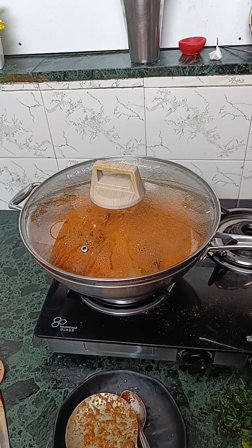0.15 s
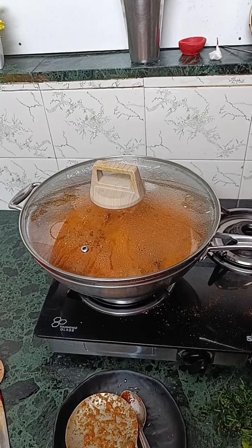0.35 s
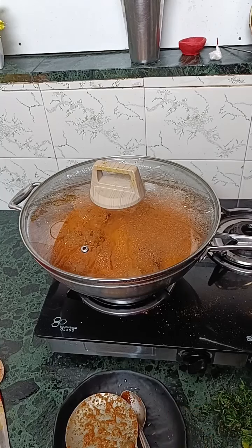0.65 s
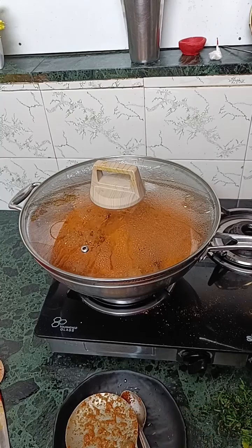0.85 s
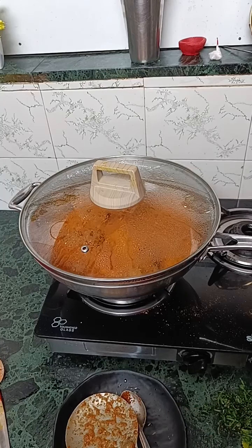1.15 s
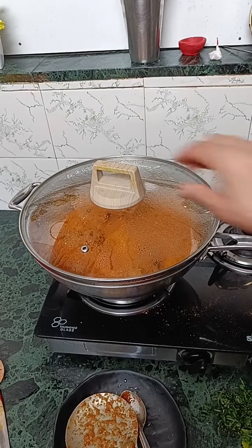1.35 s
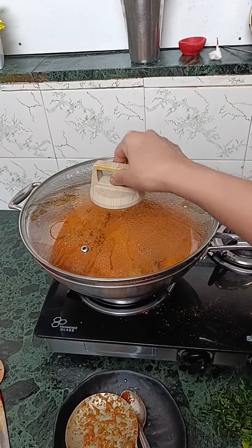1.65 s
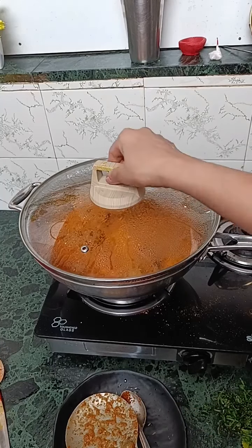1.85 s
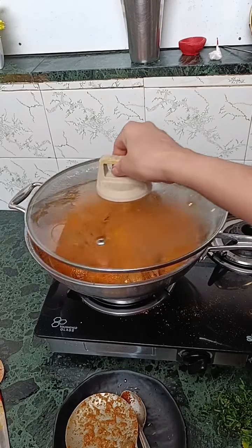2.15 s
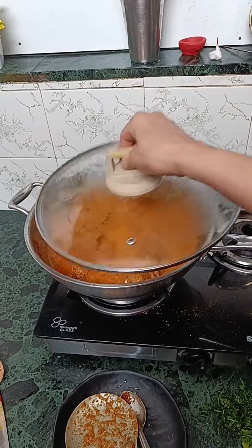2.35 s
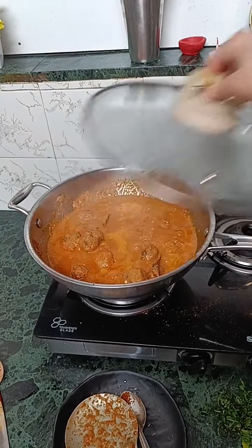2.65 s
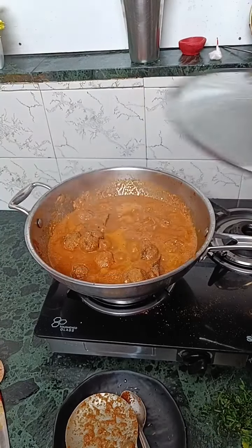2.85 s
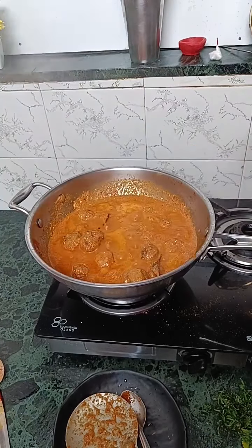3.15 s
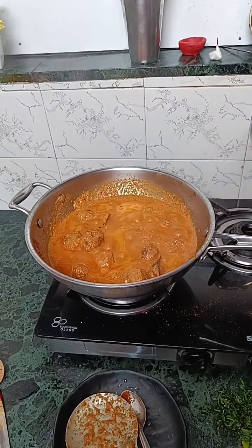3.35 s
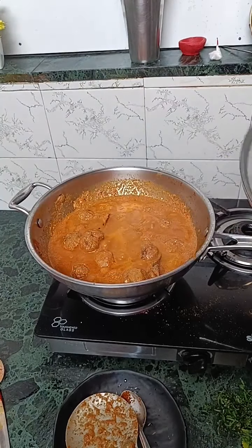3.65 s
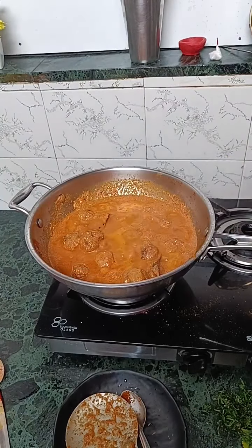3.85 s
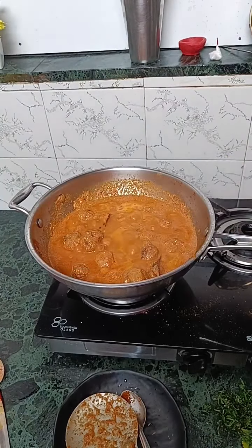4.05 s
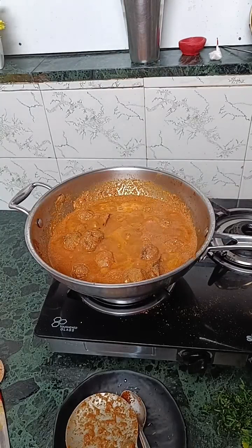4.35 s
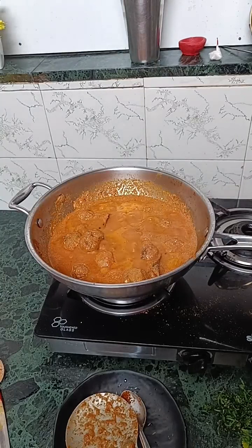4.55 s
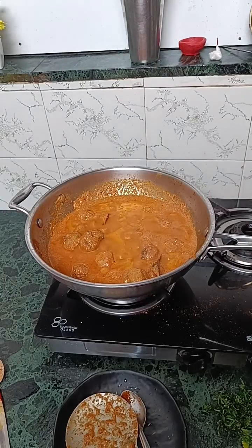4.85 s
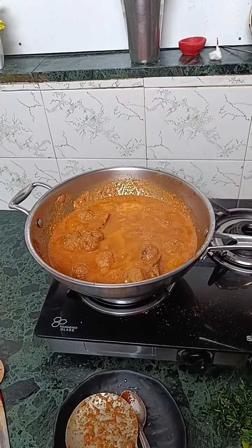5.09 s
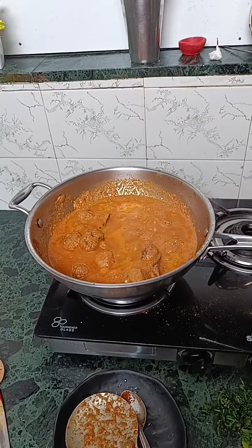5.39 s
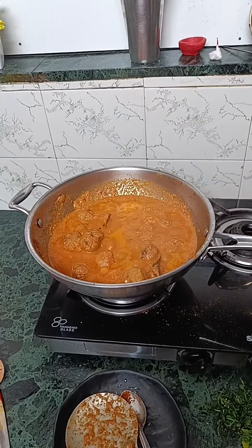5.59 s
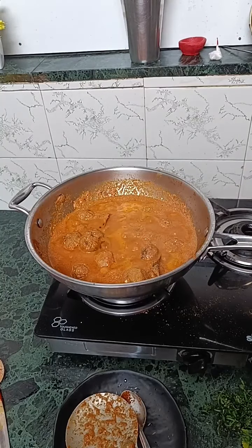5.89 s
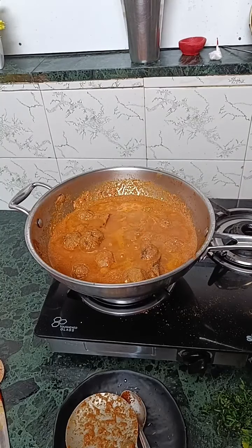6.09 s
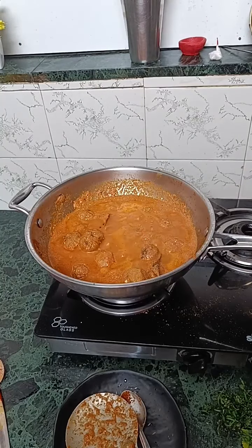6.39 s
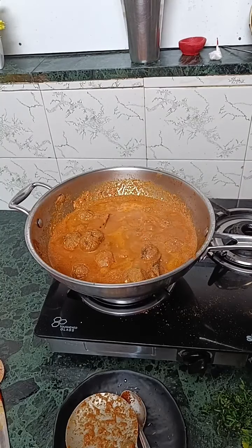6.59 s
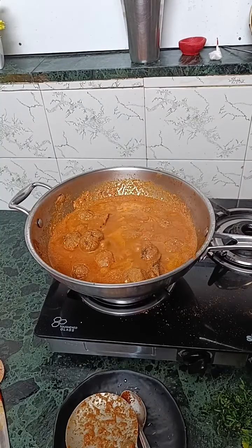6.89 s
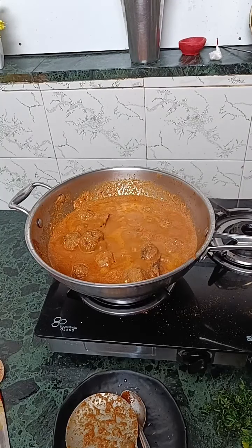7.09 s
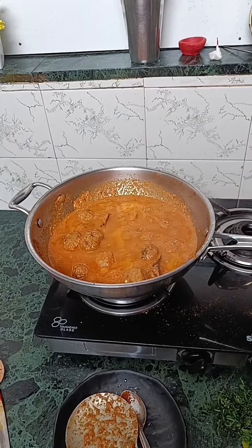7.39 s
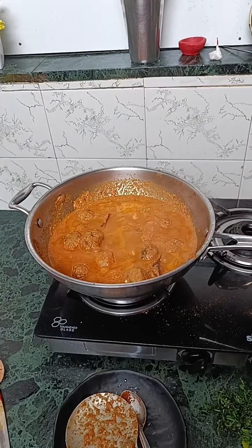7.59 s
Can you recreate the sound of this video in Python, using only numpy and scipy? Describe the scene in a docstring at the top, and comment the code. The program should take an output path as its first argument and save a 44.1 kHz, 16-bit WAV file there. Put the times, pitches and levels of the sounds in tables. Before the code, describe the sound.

In a small tiled kitchen, a gas flame hisses steadily under a simmering curry. A wooden knock on the stone worktop comes first. The muffled bubbling opens up as the glass lid is lifted, its hollow ringing gliding upward. Plops continue, then the lid's rim rattles and scrapes on steel and stone. A loud cluster of wooden thumps on the worktop ends it. Close stereo microphone.

```python
"""A curry simmers in a steel pan: small bubbles ring at random and bigger ones burst with a short tone and a splash.
A glass lid muffles the small ones at first; as it is lifted, two ringing notes of the air under it climb, then fade.
Later the lid rattles on its rim against steel and stone: uneven contacts ring its higher modes and grind.
Something wooden is put down on the worktop at the start and at the end, making the worktop ring; small ticks sound too.
Shaped noise makes the gas flame's hiss and the room tone throughout; a small tiled kitchen adds echoes."""
import sys
import numpy as np
from scipy import signal
from scipy.fft import rfft, irfft
from scipy.io import wavfile

SR = 44100
rng = np.random.default_rng(int(sys.argv[2]) if len(sys.argv) > 2 else 0)


def store_wav(level_fs):
    """Save 16-bit WAV to argv[1]."""
    pcm = np.round(np.clip(np.atleast_2d(level_fs), -1, 1) * 32767)
    wavfile.write(sys.argv[1], SR, pcm.T.astype(np.int16))


N = 340893
TIME = np.arange(N) / SR   # s

# Room tone, tilt of its noise: [f/Hz, relative level/dB]
ROOM_TONE_COLOUR = [(22, -22), (69, 14), (115, 1.5), (231, 11), (324, 4.5), (586, 5.5), (824, -17),
                    (1600, -30), (3000, -44)]
# Steady sounds, how alike left and right are: [f/Hz, likeness from 0 to 1]
STEREO_LIKENESS = [(60, 0.71), (240, 1), (950, 0.022), (15000, 0.037)]
# Gas flame over time: [t/s, hiss level/dB, fizz level/dB]
FLAME_LEVELS = [(0, -56.5, -60.5), (.9, -58, -63), (1.9, -59.5, -67), (3, -57, -64), (4.7, -56, -62),
                (7.73, -55, -63)]
# Hiss of the flame: [f/Hz, relative level/dB]
HISS_COLOUR = [(820, -1.5), (1400, -1), (2390, -2.5), (3970, 0.5), (4860, -4), (7050, -1), (8300, -11),
               (10800, -81)]
# Finer, higher fizz of the flame: [f/Hz, relative level/dB]
FIZZ_COLOUR = [(4410, -43), (7500, -12.5), (9800, -13), (14200, -12.5), (15500, -6), (15900, -66)]
# Echoes of the tiled kitchen: [f/Hz, time to die by 60 dB t/s]
ECHO_TIMES = [(150, 0.23), (500, 0.32), (2000, 0.23), (6000, 0.16), (14000, 0.053)]
# Spatters and small ticks of steel: [t/s, relative level/dB, pitch f/Hz, snap against the swell level/dB]
TICKS_AND_SPATTERS = [(0.243, -46.5, 6060, 12.5), (0.304, -48.5, 5530, -2), (2.387, -52.5, 3060, -3),
                      (2.671, -49.5, 1410, -11), (3.203, -47.5, 3530, 12.5), (3.468, -49, 2350, -7),
                      (3.484, -53.5, 7040, 9), (4.064, -51, 2100, 8), (4.076, -51.5, 5770, 8),
                      (4.384, -43.5, 4100, -31), (4.406, -51, 2010, 2), (4.471, -45.5, 2690, -21),
                      (4.799, -37.5, 1860, -21), (4.829, -47, 4030, -21), (5.156, -43, 2040, -9),
                      (5.8174, -51.5, 4030, 11), (5.928, -47, 2870, 19), (6.7018, -47, 1570, 7),
                      (6.79, -44, 2280, 10), (6.976, -60, 2110, 12), (7.0162, -43, 3930, 0),
                      (7.598, -37.5, 1310, -20)]
# Things put down on the worktop: [t/s, level/dB, extra on the low modes level/dB,
# tilt of the top modes in dB per octave, crack against the body level/dB]
LANDINGS = [(0.2423, -8, 5.5, -13, -34), (0.268, -44, 7, -6, -40), (0.3075, -17.5, 12.5, -13, -35),
            (0.351, -26.5, 4, -10, -48), (0.445, -19, 1.5, 0.5, -11), (1.911, -34, -10.5, -11, -11.5),
            (7.289, -13, -18, 2, -38), (7.296, -8, -31, -1.5, -49), (7.321, -24, 12, 1, -31),
            (7.352, 1, 8.5, -12, -17), (7.361, -16, -3, 7, -0.5), (7.374, -8.5, -11, -2, -12),
            (7.39, -14, 6, 14, -9.5), (7.409, -12.5, -1, -4, -12.5), (7.429, -6.5, -26, 0, -23),
            (7.438, -10, -6, 3, -23), (7.478, -13, 11, 5.5, -15), (7.53, -23, 11.5, 0, -23)]
# Modes of the worktop: [f/Hz, relative level/dB, time to die by 60 dB, if not damped sooner t/s]
WORKTOP_MODES = [(140, -10, 0.09), (311, 1.5, 0.05), (350, 0, 0.054), (426, 4, 0.12), (502, -5.5, 0.13),
                 (527, 13, 0.019), (700, 9, 0.03), (870, 0, 0.042), (980, 10, 0.036), (1125, 1, 0.025),
                 (1560, -1, 0.033), (2010, 10.5, 0.096), (2320, 0, 0.14), (2900, -0.5, 0.065),
                 (3540, 0.5, 0.033), (4330, -12, 0.13)]
# Crack of a hard contact: [f/Hz, relative level/dB]
CRACK_COLOUR = [(710, -1), (1200, -3.5), (2320, -3), (2910, -9), (4200, -6.5), (7190, -17), (14200, -31),
                (15800, -34)]
# Lid rattling on its rim, two bouts: [t/s, relative contact level/dB, low-mid share against it level/dB]
RIM_CONTACT = [(5.185, -25, -10), (5.191, -13, -12.5), (5.206, -26, 0), (5.24, -21.5, -9),
               (5.263, -27.5, -7), (5.294, -20, -1), (5.38, -23, 0), (5.49, -29.5, 2), (5.547, -44, 7),
               (5.551, -23, -6.5), (5.58, -23.5, -6.5), (5.609, -22.5, -8), (5.66, -31, -7.5),
               (5.72, -48, -1.5), (5.799, -61, 1)]
# Firm blows of the rim: [t/s, relative level/dB]
RIM_BLOWS = [(5.19, -15.5), (5.29, -14), (5.552, -18.5)]
# Higher modes of the lid: [f/Hz, width before narrowing f/Hz, relative level/dB,
# one or more moments when the touching point drives it best t/s]
LID_MODES = [(550, 40, -3, 5.3), (1100, 23, -11, (5.36, 5.46)), (1280, 36, -11, (5.3, 5.45, 5.61)),
             (1550, 30, -5, (5.22, 5.36)), (1720, 60, -5, 5.31), (1900, 30, -3, 5.69), (2120, 26, -2, 5.36),
             (2290, 60, -3, (5.3, 5.42, 5.56)), (2480, 23, -4, 5.43), (3110, 30, -8, (5.19, 5.72)),
             (3460, 60, -6, 5.552), (4250, 44, 0, (5.2, 5.24)), (4480, 23, -7, 5.4), (5020, 59, -6, 5.38),
             (5270, 40, -7, 5.2), (5590, 18, -5, (5.63, 5.7)), (6060, 50, -1, 5.595), (6270, 46, -6, 5.2),
             (6590, 70, -6, 5.3), (6850, 40, -4, (5.4, 5.46, 5.635)), (8340, 60, -12, 5.34)]
# Left against right for the lid modes: [f/Hz, level/dB]
LID_BALANCE = [(60, 0.5), (240, -12), (950, 7.5), (3770, 6), (15000, 17)]
# Grinding of the rim on steel: [f/Hz, relative level/dB]
GRIND_COLOUR = [(290, -36), (500, -15), (707, -15), (841, 1), (958, -7), (2710, 2.5), (6830, 1.5),
                (10000, -8), (14500, -8)]
# Lowest lid modes singing: [peak t/s, lower mode level/dB, upper mode against it level/dB,
# rise from -20 dB t/s, fall to -20 dB t/s]
LID_SINGS = [(5.32, -42, 8, .08, .035), (5.435, -28.5, -3, .08, .09), (5.6, -44, 8, .04, .05),
             (5.68, -37.5, -14, .07, .105)]
# Worktop rumbling around each bout: [peak t/s, level/dB, rise from -20 dB t/s, fall to -20 dB t/s]
WORKTOP_RUMBLES = [(5.3, -44, .13, .16), (5.61, -42, .075, .075)]
# Air under the lid: [shut f/Hz, open f/Hz, width f/Hz, level before the fade level/dB,
# bubbles per second, spread of their sizes level/dB]
LID_AIR = [(409, 600, 40, -60, 200., 3.2), (1105, 1195, 35, -70, 45., 3)]
# Bubbles that burst clearly: [t/s, relative level/dB, starting pitch f/Hz]
BURSTING_BUBBLES = [(0.79, -33, 1070), (1.403, -27, 1108), (1.829, -35.5, 390), (1.932, -26, 399),
                    (2.138, -36.5, 446), (2.238, -31, 1170), (2.314, -37, 560), (2.421, -32.5, 578),
                    (2.929, -31, 870), (2.969, -32, 940), (3.193, -26, 850), (3.749, -28.5, 924),
                    (3.907, -32.5, 965), (4.031, -35.5, 683), (4.256, -26, 840), (4.462, -30, 688),
                    (4.598, -29.5, 910), (4.813, -32.5, 1230), (4.88, -31.5, 927), (4.98, -34.5, 808),
                    (6.467, -19.5, 928), (6.517, -35, 1030), (6.635, -37, 960), (6.646, -23.5, 870),
                    (6.689, -28, 1240), (6.791, -36, 582)]

LIFT_S, OPEN_S, CLEAR_S = 1.97, 2.35, 2.47   # the lid starts to tilt, the gap is wide, the lid leaves the pan
UNMUFFLED_S = 2.92   # the muffling, easing since the first tilt, has gone
SIMMER_DB, MUFFLED_DB = -60.5, -42   # small bubbles in the open pan, and their change under the shut lid
LID_AIR_FADE_DB_PER_S = 43   # once the lid is clear
LOWEST_LID_MODES_HZ = (456, 851)
RUMBLE_MODES_HZ = (160, 285)
WEAK_MODES, WEAK_T60_S = 190, .3   # number of weak lid modes, and their time to die by 60 dB
LANDING_RISE_S = 0.00385   # time for a landing to reach half strength
LOW_MODES_HZ, TOP_MODES_HZ = 450, 800   # low worktop modes end, top modes begin
FIRM_DB, FIRM_CYCLES = 27, .25   # firm contact against the scuffing, and its length in cycles of each mode
LONGEST_RING_S = .045   # the hand and the weight of the thing damp every mode
ROCK_DB, ROCK_PER_S, ROCK_T60_S = -9, 250., .16   # the thing rocks and chatters as it settles
THUD_LAG_S = .0002   # the landings reach the right port first
TICK_RISE_S, TICK_T60_S, SNAP_T60_S = 0.0013, 0.2, 0.032   # swell and tail of a tick, and its first snap
ROOM_TONE_DB, CUTOFF_HZ = -60, 15800


def from_db(db):
    """Turns a level in dB into a gain."""
    return 10 ** (np.asarray(db) / 20)


def rms_one(x):
    """Scales a sound to an rms (a kind of average strength) of 1."""
    return x / np.sqrt(np.mean(x ** 2) + 1e-30)


def in_time(rows):
    """Joins the rows of a table by straight lines and reads them at every sample."""
    s, *columns = np.transpose(rows)
    return [np.interp(TIME, s, column) for column in columns]


def at_hz(points, hz):
    """Reads a frequency table on an axis where octaves are equally wide."""
    table_hz, values = np.array(points).T
    return np.interp(np.log(hz + 1), np.log(table_hz), values)


def ramp(start, end):
    """Climbs evenly from 0 at start to 1 at end."""
    return np.clip((TIME - start) / (end - start), 0, 1)


def swells(rows):
    """Adds gains that rise to a flat top and fall away ever faster."""
    total = 0
    for s, db, rise, fall in rows:
        distance = np.clip(np.maximum((s - TIME) / rise, (TIME - s) / fall), 0, 9)
        total = total + from_db(db - 20 * distance ** 3)
    return total


def highpass(x, hz, order):
    """Takes away what lies below hz."""
    return signal.sosfilt(signal.butter(order, hz, "high", fs=SR, output="sos"), x)


def bandpass(x, low, high, order):
    """Keeps what lies between two frequencies."""
    return signal.sosfilt(signal.butter(order, [low, high], "band", fs=SR, output="sos"), x)


def colour(x, spectrum):
    """Filters by a frequency table, with minimum phase so that nothing sounds early."""
    size = 4096
    cepstrum = irfft(np.log(from_db(at_hz(spectrum, np.fft.rfftfreq(size, 1 / SR)))))
    cepstrum[1:size // 2] *= 2
    cepstrum[size // 2 + 1:] = 0
    kernel = irfft(np.exp(rfft(cepstrum)))
    kernel = kernel / np.sqrt(np.sum(kernel ** 2))
    return signal.oaconvolve(np.atleast_2d(x), kernel[None], axes=1)[:, :N]


def drift(rate):
    """Wanders slowly by chance: noise through two one-pole low-passes at rate Hz, with spread 1."""
    step, settle = 40, 2000   # samples per slow point, and slow points thrown away
    r = np.exp(-2 * np.pi * step * rate / SR)
    slow = signal.lfilter([1], [1, -2 * r, r * r], rng.standard_normal(N // step + settle + 2))[settle:]
    return np.interp(np.arange(N) / step, np.arange(len(slow)), rms_one(slow))


def ring(clicks, hz, t60):
    """Lets each unit click start a sine of about height 1 that dies by 60 dB in t60 seconds."""
    r, w = from_db(-60 / (t60 * SR)), 2 * np.pi * hz / SR
    return signal.lfilter([0, np.sin(w)], [1, -2 * r * np.cos(w), r * r], clicks + 1e-18)


def grains(per_s, spread_db):
    """Scatters random clicks of uneven size, with rms 1."""
    sizes = from_db(spread_db * np.minimum(rng.exponential(1, N), 4)) * rng.choice([-1, 1], N)
    return rms_one(sizes * (rng.random(N) < per_s / SR))


def panned(x, db):
    """Makes two channels, the left louder by db."""
    return x * from_db([[db / 2], [-db / 2]])


def steady(spectrum, flicker_db):
    """Builds stereo noise from half-octave bands, each with its own flicker and likeness; rms 1."""
    out, edges = 0, 20 * 2 ** np.arange(0, 10.1, .5)
    edges = edges[(edges > spectrum[0][0] / 1.5) & (edges < spectrum[-1][0] * 1.5)]
    white = rng.standard_normal((2, 2, N))
    for k, (low, high) in enumerate(zip(edges, edges[1:])):
        mid, side = bandpass(white[k % 2], low, high, 2)
        alike = at_hz(STEREO_LIKENESS, np.sqrt(low * high))
        band = np.sqrt(1 + alike) * mid + np.sqrt(1 - alike) * side * [[1], [-1]]
        out = out + from_db(flicker_db * drift(2.0)) * band
    return rms_one(colour(out, spectrum))


def room_tone():
    """The quiet air of the room: low noise whose bands come and go."""
    return from_db(ROOM_TONE_DB) * steady(ROOM_TONE_COLOUR, flicker_db=3)


def gas_flame():
    """Rushing gas: an even hiss and a slightly flickering fizz, each following its own level."""
    hiss_db, fizz_db = in_time(FLAME_LEVELS)
    hiss = from_db(hiss_db) * steady(HISS_COLOUR, flicker_db=0)
    return hiss + from_db(fizz_db) * steady(FIZZ_COLOUR, flicker_db=1.0)


def kitchen(x):
    """Tiled walls: a dense tail of echoes, partly different in each channel, dying soonest in the top treble."""
    t, tail, edges = np.arange(int(.7 * SR)) / SR, 0, 60 * 2. ** np.arange(9)
    white = rng.standard_normal((2, len(t)))
    white[1] = .5 * white[0] + 0.7 * white[1]
    for low, high in zip(edges, edges[1:]):
        fade = from_db(-60 * t / at_hz(ECHO_TIMES, np.sqrt(low * high)))
        tail = tail + bandpass(white, low, high, 2) * fade * (t > .004)
    return signal.oaconvolve(x, tail / np.sqrt(np.sum(tail ** 2) / 2), axes=1)[:, :N]


def ticks():
    """A short noise burst around one broad resonance; hard contacts start with a snap."""
    out, t = np.zeros((2, N)), np.arange(int(.3 * SR)) / SR
    swell = (1 - np.exp(-t / TICK_RISE_S)) * from_db(-60 * t / TICK_T60_S)
    for s, db, hz, snap_db in TICKS_AND_SPATTERS:
        snap = from_db(snap_db - 60 * t / SNAP_T60_S)
        burst = rng.standard_normal((2, len(t))) * (swell + snap)
        broad = bandpass(burst, hz * 0.49, hz * 1.61, 2)
        click = highpass(burst, 1500, 2) * from_db(-60 * t / 0.014)
        both = from_db(-3.0) * broad + from_db(-12.0) * ring(burst, hz, 0.0042) + from_db(-10.0) * click
        out[:, int(s * SR):][:, :len(t)] += panned(from_db(db) * both, 1.6)[:, :N - int(s * SR)]
    return out


def landing_pushes(t, rise, rocking):
    """The forces of one landing on each mode: scuffing, chatter and one firm contact."""
    scuff = rng.standard_normal((len(WORKTOP_MODES), len(t))) * (from_db(-60 * t / 0.079) + rocking) * rise
    width_s = FIRM_CYCLES / np.array(WORKTOP_MODES)[:, :1]
    bump = np.exp(-((t - LANDING_RISE_S) / width_s) ** 2) / (width_s * SR)
    # the slope of the bump: a push one way and then back
    firm = np.gradient(bump, axis=1) * SR * width_s / (2 * np.pi * FIRM_CYCLES)
    return scuff + from_db(FIRM_DB) * firm


def thuds():
    """Uneven landings ring the worktop and chatter on; harder corners wake the upper modes and crack."""
    out, t = np.zeros((2, N)), np.arange(int(.4 * SR)) / SR
    rise = (t / LANDING_RISE_S) ** 2 / (1 + (t / LANDING_RISE_S) ** 2)
    for s, db, weight_db, bright_db, crack_db in LANDINGS:
        chatter = (rng.random(len(t)) < ROCK_PER_S / SR) * np.sqrt(SR / ROCK_PER_S) * from_db(-60 * t / ROCK_T60_S)
        pushes = landing_pushes(t, rise, from_db(ROCK_DB) * chatter)
        spot = rng.normal(1, 0.015, len(WORKTOP_MODES))   # every spot of the worktop sounds a little different
        modes = []
        for push, shift, (hz, level_db, t60) in zip(pushes, spot, WORKTOP_MODES):
            octaves_up = max(np.log2(hz / TOP_MODES_HZ), 0)
            mode_db = level_db + weight_db * (hz < LOW_MODES_HZ) + bright_db * octaves_up
            modes.append(from_db(mode_db) * ring(push, hz * shift, min(t60, LONGEST_RING_S)))
        # each port hears its own mix of modes
        body = from_db(rng.normal(0, 1.5, (2, len(WORKTOP_MODES)))) @ np.array(modes)
        crackle = rng.standard_normal((2, len(t))) * (1 + 0.14 * chatter) * (t > LANDING_RISE_S / 2)
        crack = colour(crackle * from_db(-60 * t / 0.11), CRACK_COLOUR)[:, :len(t)]
        both = from_db(db) * (body / np.max(np.abs(body)) + from_db(crack_db) * crack)
        out[:, int(s * SR):][:, :len(t)] += both[:, :N - int(s * SR)]
    out[0] = np.roll(out[0], int(THUD_LAG_S * SR))
    return highpass(out, 105, 3)   # too small to radiate deep bass


def rim_blows():
    """The strength of the firm blows: sudden contacts that die by 60 dB in 25 ms."""
    at, db = np.transpose(RIM_BLOWS)
    clicks = np.zeros(N)
    clicks[(at * SR).astype(int)] = from_db(db)
    return signal.lfilter([1], [1, -from_db(-60 / (.025 * SR))], clicks + 1e-18)


def lid_singing():
    """The two lowest modes sound clean, wavering a little, in a few swells at listed times."""
    out = np.zeros((2, N))
    for k, hz in enumerate(LOWEST_LID_MODES_HZ):
        gain = swells([(s, db + k * upper_db, rise, fall) for s, db, upper_db, rise, fall in LID_SINGS])
        out += gain * np.sin(2 * np.pi * np.cumsum(hz + 3.67 * drift(10.7)) / SR)
    return out


def lid_ringing(high, low, blows):
    """Dense rim contacts and firm blows set the higher modes of the lid ringing."""
    out = np.zeros((2, N))
    for hz, width_hz, level_db, best_s in LID_MODES:
        t60 = np.log(1000) / (np.pi * width_hz * .7)   # narrowed to 0.7 of the width
        # the touching point wanders round the rim, so each mode comes and goes
        nearness = np.exp(-((TIME - np.reshape(best_s, (-1, 1))) / .03) ** 2).max(axis=0)
        favour_db = 12 * nearness + 2.5 * drift(9)
        rub = (low if hz < 2600 else high) * from_db(favour_db - 15.5)
        # long rings get weaker pushes, so that they do not pile up
        push = rub * grains(1400.0, 4.2) * np.sqrt(4 * np.log(1000) / (t60 * SR))
        strike = from_db(-38.0) * blows * rng.standard_normal(N)
        tone = from_db(level_db) * ring(push + strike, hz, t60)
        # each mode reaches the two microphone ports with a lag of its own
        ports = np.array([tone, np.roll(tone, rng.integers(-14, 14))])
        out += panned(ports, at_hz(LID_BALANCE, hz))
    return out


def lid_grinding(grit, high, low):
    """Grinding rings many weak modes, thin lines with gaps, under a dry crackle of single contacts."""
    t = np.arange(SR // 4) / SR
    weak_hz = 15800 * rng.uniform(.03, 1, (WEAK_MODES, 1)) ** 1.3
    phase = 2 * np.pi * rng.random((2, WEAK_MODES, 1))
    weak_gain = from_db(rng.normal(0, 4, weak_hz.shape))
    thicket = np.sum(weak_gain * np.sin(2 * np.pi * weak_hz * t + phase), axis=1) * from_db(-60 * t / WEAK_T60_S)
    rung = rms_one(signal.oaconvolve(grit, thicket, axes=1)[:, :N]) * from_db(1.5 * drift(45.0))
    rung = rung + from_db(-4) * colour([grains(700., 4.5), grains(700., 4.5)], GRIND_COLOUR)
    dull = signal.sosfilt(signal.butter(2, 2600, fs=SR, output="sos"), rung)
    return from_db(3.0) * (rms_one(rung - dull) * high + rms_one(dull) * low)


def worktop_rumble():
    """The worktop rumbles in swells at listed times: noise rings two deep modes."""
    rumble = sum(hz ** 2 * ring(rng.standard_normal(N), hz, .2) for hz in RUMBLE_MODES_HZ)
    return swells(WORKTOP_RUMBLES) * rms_one(rumble)


def lid():
    """Rim contacts and blows ring the higher modes and grind; lowest modes and rumble swell at listed times."""
    # silence just before the first contact and soon after the last
    rows = [(RIM_CONTACT[0][0] - .002, -90, 0)] + list(RIM_CONTACT) + [(RIM_CONTACT[-1][0] + .06, -90, 0)]
    contact_db, low_db = in_time(rows)
    high, low, blows = from_db(contact_db), from_db(contact_db + low_db), rim_blows()
    grit = highpass(colour([grains(6000., 1.7), grains(6500.0, 3.7)], GRIND_COLOUR), 420, 4)
    touch = lid_singing() + lid_ringing(high, low, blows) + lid_grinding(grit, high, low)
    touch = touch + from_db(2.5) * grit * blows + worktop_rumble()
    return highpass(touch, 135, 4)   # too small to radiate deep bass


def air_under_lid():
    """Bubbles under the glass excite two air resonances, which climb as the lid opens and fade when it is clear."""
    out, gap = 0, np.sqrt(ramp(LIFT_S, OPEN_S))
    for shut_hz, open_hz, width_hz, db, per_s, spread_db in LID_AIR:
        turn = np.exp(2j * np.pi * np.cumsum(shut_hz + gap * (open_hz - shut_hz)) / SR)
        r = np.exp(-np.pi * width_hz / SR)
        # a resonance that follows the pitch: shift down, low-pass, shift back
        followed = turn * signal.lfilter([1], [1, -r], grains(per_s, spread_db) / turn)
        out = out + from_db(db) * rms_one(np.real(followed))
    return out * from_db(-LID_AIR_FADE_DB_PER_S * np.maximum(TIME - CLEAR_S, 0))


def pops():
    """A bursting bubble swells fast and rings briefly, rising a little in pitch; the torn film splashes."""
    out, t = np.zeros(N), np.arange(int(.2 * SR)) / SR
    for s, db, hz in BURSTING_BUBBLES:
        shape = (1 - np.exp(-t / .005)) * from_db(-60 * t / (.012 + 14 / hz))
        splash = bandpass(rng.standard_normal(len(t)), hz * .7, hz * 1.7, 1)
        tone = np.sin(2 * np.pi * hz * (t + 2.0 * t ** 2))
        out[int(s * SR):][:len(t)] += from_db(db) * shape * (tone + 0.58 * splash)
    return out


def simmer():
    """Small thick bubbles at random, clumped, each ringing a few cycles."""
    born = grains(110. * from_db(4.5 * drift(7.)), 2.2)
    # each bubble is dealt one of 16 pitches
    pitches, dealt = np.geomspace(580, 1500, 16), rng.integers(0, 16, N)
    rings = sum(ring(born * (dealt == k), hz, 15.6 / hz) for k, hz in enumerate(pitches))
    softened = rms_one(signal.lfilter([1], [1, -.9], rings))
    # muffled at first, growing steadily louder from the first tilt of the lid until shortly after it is off
    level_db = SIMMER_DB + MUFFLED_DB * (1 - ramp(LIFT_S, UNMUFFLED_S))
    return from_db(level_db) * softened


def scene():
    """Adds the flame and room tone, the hits, the bubbles and the kitchen's echoes of hits and bubbles."""
    background = gas_flame() + room_tone()
    knocks, rattle = thuds(), lid()
    pan = panned(air_under_lid() + pops() + simmer(), 3.3)
    small = pan + ticks()
    echoes = kitchen(from_db(-12) * rattle + from_db(-3) * knocks + from_db(-8) * small)
    return background + knocks + rattle + small + echoes


def record(dry):
    """The microphone loses the deepest bass; peaks are rounded and the top is cut."""
    rounded = np.tanh(highpass(dry, 40, 1))
    return signal.sosfilt(signal.cheby2(14, 80, CUTOFF_HZ * 1.03, fs=SR, output="sos"), rounded)


dry = scene()
out = record(dry)
store_wav(out)
```